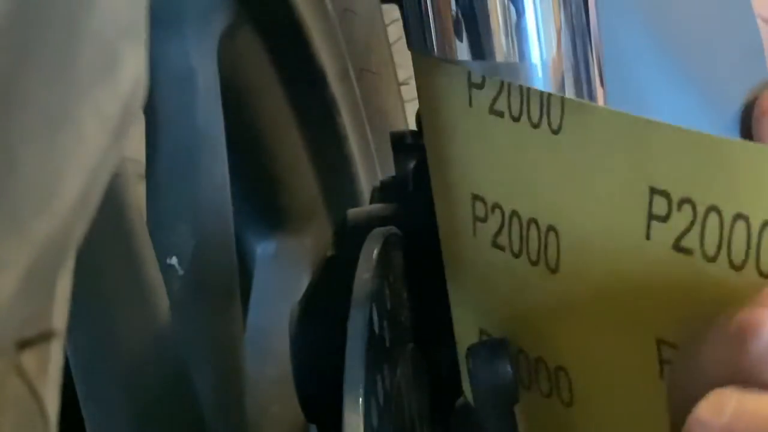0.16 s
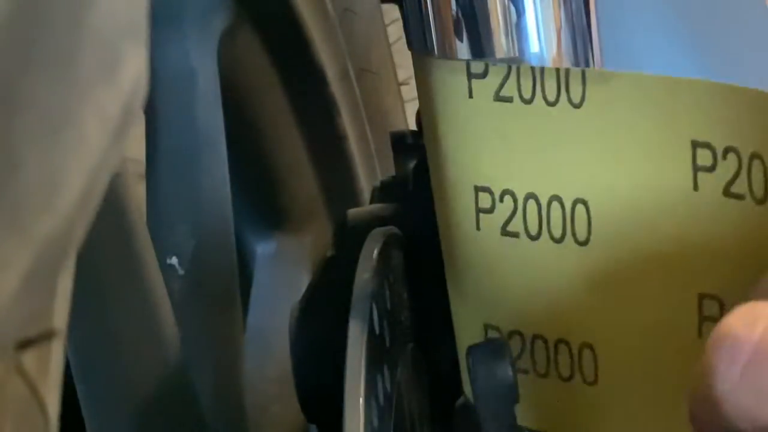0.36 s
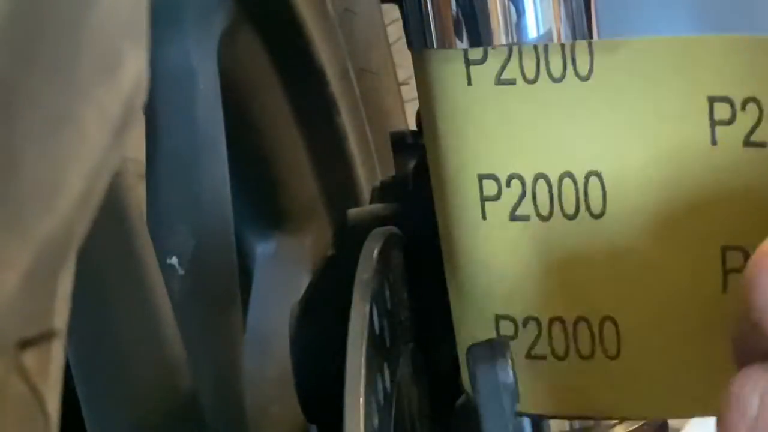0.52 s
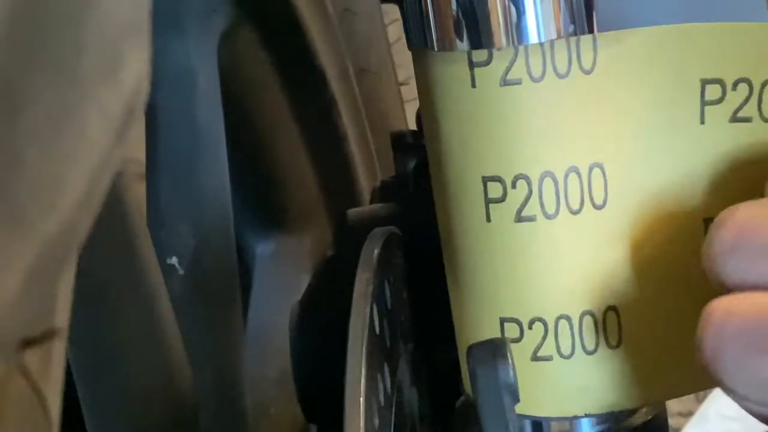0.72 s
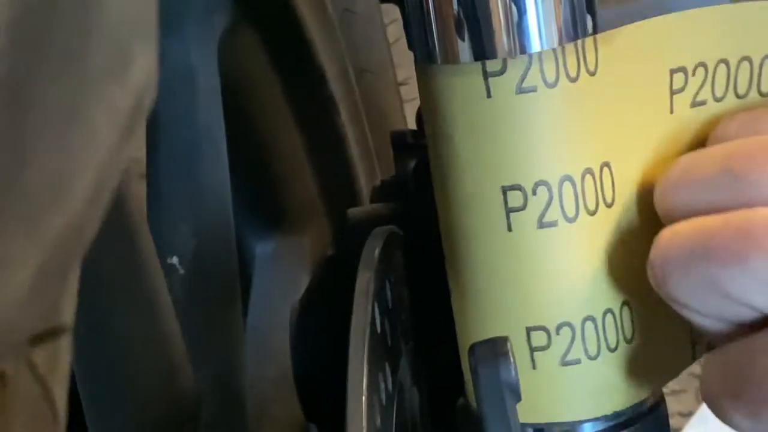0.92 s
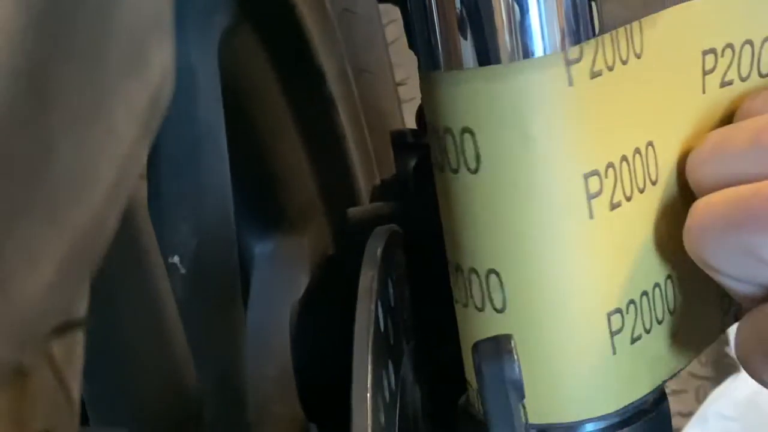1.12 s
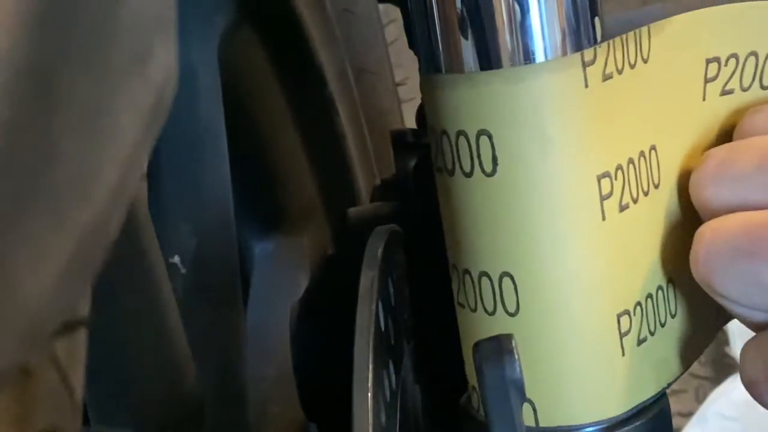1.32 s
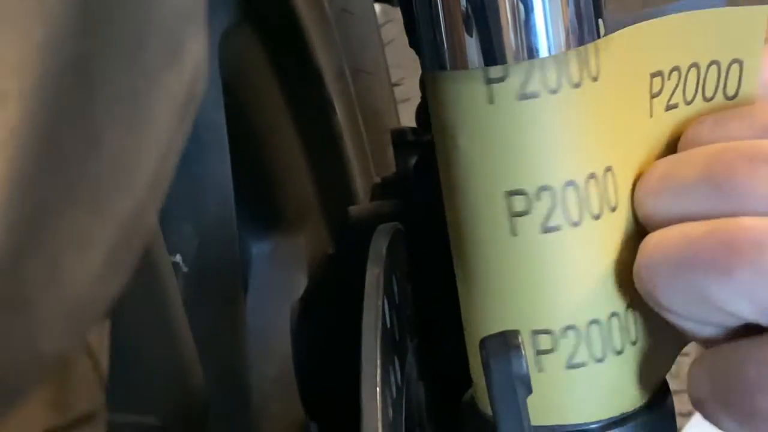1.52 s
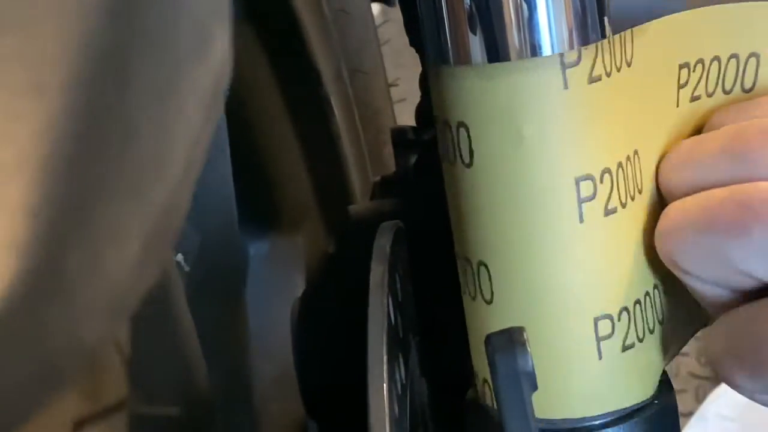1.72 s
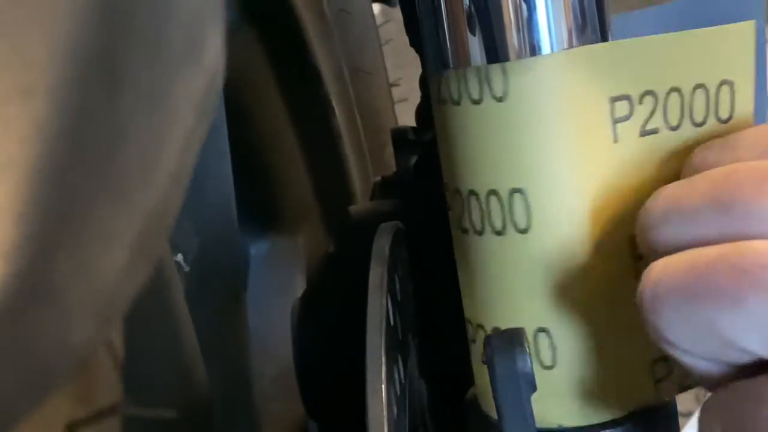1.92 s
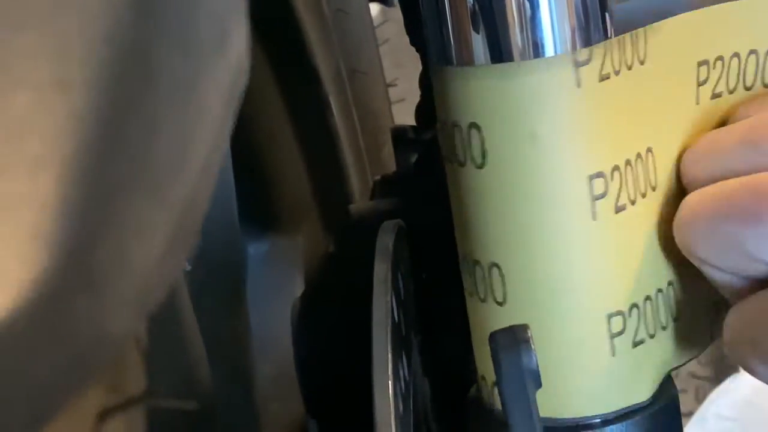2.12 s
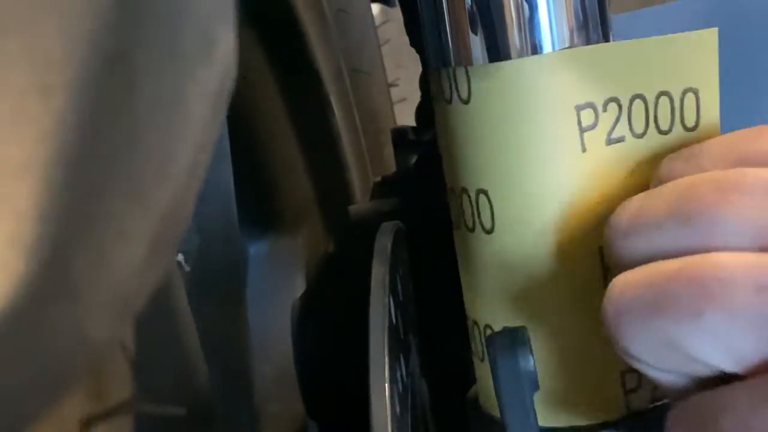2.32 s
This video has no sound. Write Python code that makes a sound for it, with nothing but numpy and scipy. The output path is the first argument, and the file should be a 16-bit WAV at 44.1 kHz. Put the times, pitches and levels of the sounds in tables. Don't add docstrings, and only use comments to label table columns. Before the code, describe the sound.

Close up in a garage, sandpaper drags softly along a steel tube, a loud hard clank interrupts early, the scrape swells and stops, then brisk alternating swishes with tiny squeaks and taps run to the end.

```python
import sys
import numpy as np
from scipy import signal
from scipy.io import wavfile
from scipy.ndimage import uniform_filter1d

SR = 44100
rng = np.random.default_rng(int(sys.argv[2]) if len(sys.argv) > 2 else 0)


def log_audio(samples):
    frames = np.atleast_2d(samples).T
    limited = np.clip(frames, -1, 1)
    pcm = np.round(limited * 32767).astype(np.int16)
    wavfile.write(sys.argv[1], SR, pcm)


def linear_from_db(decibels):
    return 10 ** (np.asarray(decibels, float) / 20)


N = 103635
T = np.arange(N) / SR
SCENE_CHANGE_S = 1.412

# t/s, pressure level/dB, low-body share/dB, groan level/dB
DRAG_PATH = [(0, -41.5, 3, -59), (.15, -41.5, 3.5, -71), (.22, -44.5, 7.5, -46), (.32, -48.5, 10.5, -53.5),
             (.45, -47, 1, -56), (.56, -49, 9, -71), (.62, -47.5, 6.5, -43), (.68, -41.5, 8.5, -50),
             (.705, -35, 0.5, -49), (0.734, -32.5, 0.5, -41), (.79, -41.5, 7.5, -45), (.82, -45, 9, -52),
             (0.879, -39.5, 0, -41.5), (0.971, -33, -3, -63), (1.197, -37, 1, -56),
             (1.217, -51.5, -8, -62.5), (1.28, -71, -9, -60), (1.32, -78, 8.5, -78.5)]
# f/Hz, level/dB
DRAG_HISS = [(500, -17), (1430, -16), (2790, -7.5), (4160, -8), (6500, -8.5), (8500, -6), (12000, -13.5),
             (15500, -10.5)]
# f/Hz, width/Hz, level/dB
WALL_MODES = [(2266, 22, 0), (2830, 130, -20), (4010, 110, 5.5), (4450, 58, 3), (5000, 46, 0),
              (5750, 260, 5), (7000, 120, -14)]
# f/Hz, width/Hz, level/dB
GROAN_MODES = [(213, 100, -6.5), (321, 44, -7)]
WALL_DB = -12.5
BODY_HZ, BODY_DB = 2200, 1
WHINE_S, WHINE_SPAN_S, WHINE_HZ, WHINE_WIDTH_HZ, WHINE_DB = 0.45, 0.092, 3090, 200, -48.5

# start t/s, stop t/s
STROKE_TIMES = [(1.418, 1.514), (1.519, 1.604), (1.619, 1.689), (1.691, 1.768), (1.774, 1.840),
                (1.844, 1.908), (1.912, 1.974), (1.977, 2.044), (2.047, 2.109), (2.113, 2.174),
                (2.178, 2.239), (2.244, 2.305), (2.308, 2.372)]
# speed level/dB, whistle level/dB, whistle place/0-1, lean of speed peak/1, pointedness/1
STROKE_SHAPES = [(-41.5, -26, .5, 1.3, 0.18), (-40.5, -14, 0.67, 2, 0.18), (-33.5, -14, 0.41, 0.95, 0.73),
                 (-41, 3.5, 0.4, 1.45, 0.18), (-35, -15, 0.75, 0.58, .3), (-40, -8, 0.2, .9, .15),
                 (-36, -18, 0.2, 0.5, 0.096), (-40.5, -7, 0.5, 1.8, 0.14), (-35.5, -17, 0.72, 1.24, 0.31),
                 (-39.5, -11, 0.75, 1.7, 0.27), (-38.5, -14.5, 0.43, 1.1, 0.28),
                 (-40.5, -19, 0.4, 1.7, 0.13), (-37.5, -24, 0.6, 0.96, 0.32)]
# f/Hz, level/dB
PUSH_HISS = [(290, -39.5), (500, -14.5), (620, -20.5), (1450, -9), (1930, -15.5), (2980, -14), (6570, -9),
             (9410, -3.5), (15600, -4)]
# f/Hz, level/dB
PULL_HISS = [(290, -17.5), (500, -4), (889, -27.5), (1470, -5.5), (1670, -14.5), (2360, -10), (6570, -7),
             (9680, -4.5), (15600, -6)]
FIRST_RISE_S, PUSH_RISE_S, PULL_RISE_S, STOP_S = 0.016, 0.014, 0.015, 0.0063
WHISTLE_FROM_HZ, WHISTLE_TO_HZ, WHISTLE_WIDTH_HZ = 7400, 1270, 920
WHISTLE_SPAN = 0.27

# t/s, level/dB, pitch factor/1
KNOCKS = [
    (0.2317, -25, 0.76),
    (0.2323, -12.5, .85),
    (0.2344, 0.5, 1.0),
    (.2385, -24.5, 1.2),
    (0.2436, -14.5, 1.1),
    (0.2506, -19.5, 1.3),
    (0.2652, -19, .9),
    (.297, -28, 1.0),
]
# f/Hz, level/dB, t60/s
TUBE_MODES = [(189, -20, 0.071), (370, -19, 0.04), (660, -26.5, 0.046), (884, -17.5, 0.036),
              (1316, -20, 0.06), (1593, -15, 0.037), (1756, -4, 0.022), (1954, 3.5, 0.01),
              (2264, -12, 0.044), (2425, -2, 0.011), (3160, -8, 0.016), (3480, -8, 0.011),
              (4420, -22.5, 0.024), (5290, -19.5, 0.02)]
# f/Hz, left minus right level/dB
KNOCK_BALANCE = [(170, 3), (420, 0.3), (740, 6), (1220, 0.4), (2000, -1.5), (3300, 0.1)]
CRACK_HZ, CRACK_WIDTH_HZ, CRACK_DB, CRACK_T60_S = 4900, 2600, -11, 0.017
SHIVER_HZ, SHIVER_WIDTH_HZ, SHIVER_DB, SHIVER_T60_S = 2070, 1000, -30.5, 0.41
ROOM_DB, ROOM_T60_S = -19, 0.26

# t/s, level/dB, f/Hz, t60/s
TAP_EVENTS = [(0.9, -41.5, 290, 0.37), (1.11, -46, 270, .35), (1.19, -46, 262, .3),
              (1.215, -50.5, 1350, 0.16), (1.286, -52, 3300, 0.009), (1.2935, -52, 6100, .007),
              (1.308, -49.5, 1350, 0.21), (1.351, -57, 5900, .007), (1.377, -58, 4200, .007),
              (1.386, -37, 204, 0.093), (1.479, -37, 1660, 0.041), (1.570, -40, 2400, 0.036),
              (1.648, -37, 9000, .03), (1.665, -36.5, 1580, 0.048), (1.742, -37, 2300, 0.033),
              (1.749, -35, 1500, 0.032), (1.753, -37, 565, 0.065), (1.857, -37, 4200, .03),
              (1.863, -33.5, 3800, .04), (1.869, -37, 3300, .03), (1.881, -39, 1370, 0.02),
              (1.914, -41, 1200, 0.06), (1.944, -43, 1250, 0.046), (1.962, -42, 3500, .05),
              (2.031, -38.5, 1480, 0.071), (2.075, -41, 1200, .03), (2.081, -33, 2100, 0.018),
              (2.092, -28.5, 1720, 0.015), (2.150, -36.5, 1800, .025), (2.154, -39.5, 620, 0.035),
              (2.215, -37, 1470, 0.03), (2.288, -36, 1600, 0.015), (2.297, -38, 1450, 0.04)]
TAP_RISE_S, TICK_DB = 0.0017, 0.5

# f/Hz, level/dB
FIRST_HUM = [(15, -51.5), (28, -20), (75, -7.5), (170, -18), (270, -16.5), (900, -28.5), (3000, -41),
             (15600, -60)]
# f/Hz, level/dB
SECOND_HUM = [(40, -55), (100, -18), (200, -11), (300, -10), (350, -1.5), (400, -13), (900, -21.5),
              (15000, -26)]
# f/Hz, width/Hz, level/dB
MACHINES = [(63, 11, -57), (90.2, 13, -56)]
FIRST_HUM_DB, SECOND_HUM_DB = -50.5, -51.5

# f/Hz, level/dB
FIRST_APART = [(60, -15), (400, -8), (1500, -2), (2300, -17), (3200, -14), (5000, -26), (8000, -45)]
# f/Hz, level/dB
SECOND_APART = [(100, -15), (900, -10), (2500, -17), (4800, -18), (6200, -9), (7500, -21), (10000, -22),
                (12000, -16), (15000, -22)]
# f/Hz, share/1
FAINT_SHARE = [(6900, .12), (8600, .22), (10200, .2), (12000, .47), (14000, .36), (15500, .25)]
FAINT_WAVER = 0.3
PORT_FROM_HZ, PORT_WAVER_HZ, PORT_LAG_S = 6800, 90, 0.000288
BASS_CUT_HZ = 80


def drag():
    s, level_db, body_db, groan_db = np.transpose(DRAG_PATH)
    hiss = colour(grit(4000, 2.5, 0.49), [(250, -50)] + DRAG_HISS, 1.33, 0.34)
    wall = sum(linear_from_db(db) * evened(resonate(hiss, hz, width)) for hz, width, db in WALL_MODES)
    hiss = hiss + linear_from_db(WALL_DB) * evened(wall)
    body = filtered(hiss, 2, BODY_HZ, "low")
    body_gain = linear_from_db(np.interp(T, s, body_db) + BODY_DB)
    scrape = linear_from_db(np.interp(T, s, level_db) + 4.5) * (hiss - body + body_gain * body)

    groan = sum(linear_from_db(db) * evened(resonant_noise(N, hz, width)) for hz, width, db in GROAN_MODES)
    groan = linear_from_db(np.interp(T, s, groan_db)) * groan
    whine = evened(resonant_noise(N, WHINE_HZ, WHINE_WIDTH_HZ))
    whine = linear_from_db(WHINE_DB) * np.exp(-((T - WHINE_S) / WHINE_SPAN_S) ** 2) * whine
    return scrape + whine + groan


def film_whistle(film, u, level_db, place):
    hz = WHISTLE_FROM_HZ * (WHISTLE_TO_HZ / WHISTLE_FROM_HZ) ** u
    whistle = evened(resonate_twice(film, hz, WHISTLE_WIDTH_HZ))
    return linear_from_db(level_db - 5) * np.exp(-((u - place) / WHISTLE_SPAN) ** 2) * whistle


def strokes():
    push, pull = (colour(grit(6000, 3.1, 0.29), [(150, -62)] + list(shape), 1.96, 1.15)
                  for shape in (PUSH_HISS, PULL_HISS))
    out = np.zeros(N)
    film = rng.standard_normal(N)
    film = film * linear_from_db(2.5 * evened(uniform_filter1d(rng.standard_normal(N), 250)))
    for k, ((start_s, stop_s), shape) in enumerate(zip(STROKE_TIMES, STROKE_SHAPES)):
        level_db, whistle_db, place, lean, pointed = shape
        at, length_s = round(start_s * SR), stop_s - start_s
        t = np.arange(0, length_s, 1 / SR)[:N - at]
        u = t / length_s
        if k % 2:
            hiss, rise_s = pull, PULL_RISE_S
        else:
            hiss, rise_s = push, PUSH_RISE_S if k else FIRST_RISE_S
        speed = np.sin(np.pi * u ** abs(lean)) ** abs(pointed)
        speed *= np.minimum(t / rise_s, 1) * np.minimum((length_s - t) / STOP_S, 1)
        part = slice(at, at + len(u))
        whistle = film_whistle(film[part], u, whistle_db, place)
        add(out, start_s, linear_from_db(level_db + 2.5) * speed * (hiss[part] + whistle))
    return out


def knock():
    out, t = np.zeros((2, N)), np.arange(12000) / SR
    side = np.array([[0.5], [-0.5]])
    for s, db, pitch in KNOCKS:
        ring = sum(linear_from_db(mode_db + side * read(KNOCK_BALANCE, hz)) * decay(t, t60_s)
                   * np.sin(2 * np.pi * hz * pitch * t) for hz, mode_db, t60_s in TUBE_MODES)
        add(out.T, s, (linear_from_db(db) * (1 - np.exp(-t / 0.0005)) * ring).T)

    crack = resonant_noise(len(t), CRACK_HZ, CRACK_WIDTH_HZ)
    crack *= linear_from_db(CRACK_DB) * decay(t, CRACK_T60_S) * np.minimum(t / 0.00048, 1)
    shiver = evened(resonant_noise(len(t), SHIVER_HZ, SHIVER_WIDTH_HZ))
    shiver *= linear_from_db(SHIVER_DB) * decay(t, SHIVER_T60_S) * np.minimum(t / 0.002, 1)
    shiver = filtered(shiver, 4, 6000, "low")
    add(out.T, KNOCKS[2][0] - 0.0008, (crack + shiver)[:, None])

    tail = rng.standard_normal((2, len(t))) * decay(t, ROOM_T60_S)
    tail[1] = tail[0] + 2.1 * uniform_filter1d(tail[1], 9)
    wet = signal.fftconvolve(out, tail / np.linalg.norm(tail[0]), axes=1)[:, :N]
    return filtered(out, 2, 110, "high") + linear_from_db(ROOM_DB) * filtered(wet, 4, 5000, "low")


def taps():
    out, t = np.zeros(N), np.arange(6000) / SR
    for s, db, hz, t60_s in TAP_EVENTS:
        partials = sum(np.sin(2 * np.pi * hz * k * t) for k in (0.75, 1.25, 2.4))
        tick = linear_from_db(TICK_DB - 220 * t60_s) * decay(t, t60_s) * partials
        rise = 1 - np.exp(-t / (TAP_RISE_S * t60_s / 0.13))
        add(out, s, linear_from_db(db) * decay(t, t60_s) * rise * (np.sin(2 * np.pi * hz * t) + tick))
    return out


def garage_hum(shape, level_db, patchy_db, flicker_db):
    return linear_from_db(level_db) * colour(rng.standard_normal(N), shape, patchy_db, flicker_db, size=2048)


def machines():
    return sum(linear_from_db(db) * evened(resonate(rng.standard_normal(N), hz, width)) for hz, width, db in MACHINES)


def spread(x, apart, lag_s):
    hz, _, z = signal.stft(x, SR, nperseg=512, noverlap=384)
    other = z * np.exp(2j * np.pi * rng.random(z.shape)) * linear_from_db(read(apart, hz))[:, None]
    waver, shift = drifting(z.shape, 20, 16), drifting(z.shape, 20, 16)
    angle = np.pi * lag_s * np.maximum(hz[:, None] - PORT_FROM_HZ + PORT_WAVER_HZ * shift, 0)
    faint = read(FAINT_SHARE, hz)[:, None] * (1 + FAINT_WAVER * waver)
    mid, side = (v * (abs(v) > faint) for v in (np.cos(angle), np.sin(angle)))
    side = other - 1j * side * z
    ports = np.array([mid * z + side, mid * z - side])
    return signal.istft(ports, SR, nperseg=512, noverlap=384)[1][:, :N]


def grit(per_s, spread_db, share):
    size = linear_from_db(spread_db * np.minimum(rng.exponential(1, N), 5)) * (rng.random(N) < per_s / SR)
    grains = evened(size * rng.choice([-1., 1.], N))
    return evened(rng.standard_normal(N) + share * grains)


def colour(x, shape, patchy_db, flicker_db, size=256):
    hz, t, z = signal.stft(x, SR, nperseg=size, noverlap=size * 3 // 4)
    patches = drifting(z.shape, 4, 12)
    flicker = evened(uniform_filter1d(rng.standard_normal(len(t)), 5))
    z = z * linear_from_db(read(shape, hz)[:, None] + patchy_db * patches + flicker_db * flicker)
    return evened(signal.istft(z, SR, nperseg=size, noverlap=size * 3 // 4)[1][:N])


def drifting(shape, bins, frames):
    noise = uniform_filter1d(rng.standard_normal(shape), frames, axis=1)
    return evened(uniform_filter1d(noise, bins, axis=0))


def resonate(x, hz, width_hz):
    turn = np.exp(2j * np.pi * np.cumsum(hz * np.ones(len(x))) / SR)
    r = np.exp(-np.pi * abs(width_hz) / SR)
    return 2 * (turn * signal.lfilter([1 - r], [1, -r], x / turn)).real


def resonate_twice(x, hz, width_hz):
    return resonate(resonate(x, hz, width_hz), hz, width_hz)


def resonant_noise(n, hz, width_hz):
    return resonate_twice(rng.standard_normal(n), hz, width_hz)


def filtered(x, order, hz, kind):
    return signal.sosfilt(signal.butter(order, hz, kind, fs=SR, output="sos"), x)


def decay(t, t60_s):
    return linear_from_db(-60 * t / t60_s)


def evened(x):
    return x / np.sqrt(np.mean(x ** 2) + 1e-20)


def read(points, hz):
    f, value = np.transpose(points)
    return np.interp(np.log(hz + 1), np.log(f + 1), value)


def add(mix, s, sound):
    part = mix[round(s * SR):][:len(sound)]
    part += sound[:len(part)]


def scene():
    first = np.clip((SCENE_CHANGE_S - T) / 0.0061 + 0.5, 0, 1)
    small = taps()
    first_hum = garage_hum(FIRST_HUM, FIRST_HUM_DB, 2.2, 1.0)
    second_hum = garage_hum(SECOND_HUM, SECOND_HUM_DB, 1.35, 0.39)
    shot_1 = spread(first * (drag() + small + first_hum + machines()), FIRST_APART, PORT_LAG_S)
    shot_2 = spread(strokes() + (1 - first) * (small + second_hum), SECOND_APART, 0)
    shot_2 = filtered(shot_2, 4, BASS_CUT_HZ, "high") + linear_from_db(-35.5) * shot_2
    return shot_1 + shot_2 + knock()


def roll_off(x):
    return signal.sosfilt(signal.butter(12, 15720, fs=SR, output="sos"), x)


def record(dry):
    mix = np.clip(dry, -1.0, 1.0)
    return roll_off(mix)


dry = scene()
out = record(dry)
log_audio(out)
```